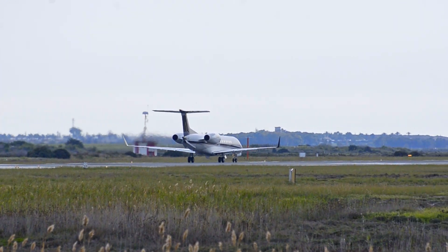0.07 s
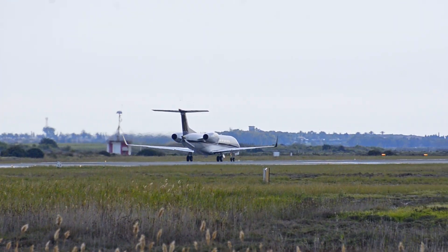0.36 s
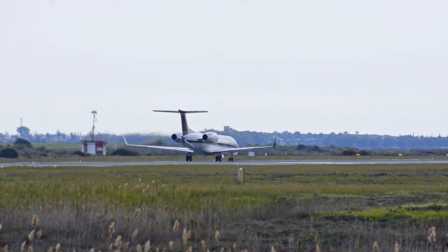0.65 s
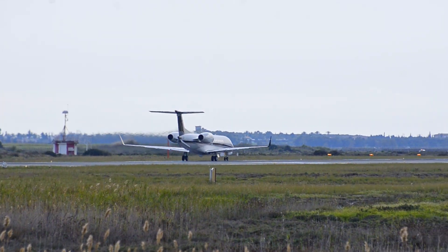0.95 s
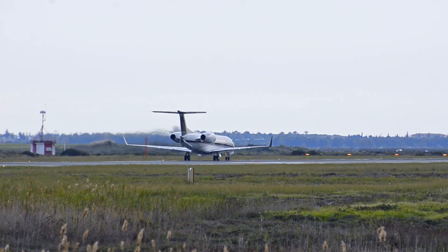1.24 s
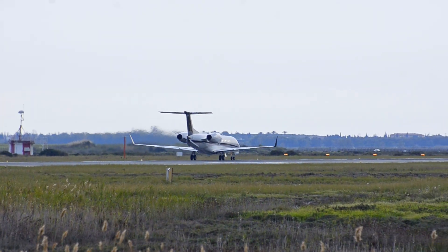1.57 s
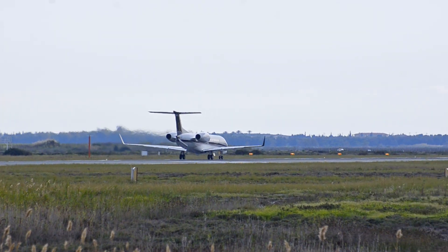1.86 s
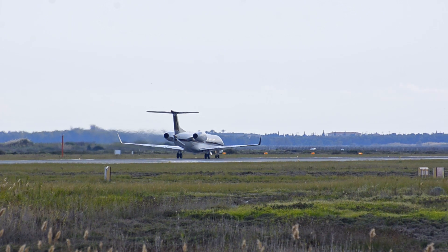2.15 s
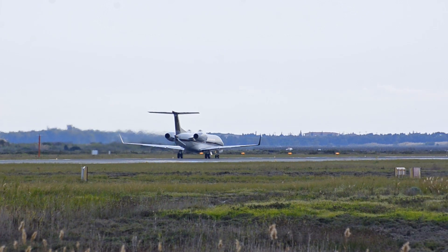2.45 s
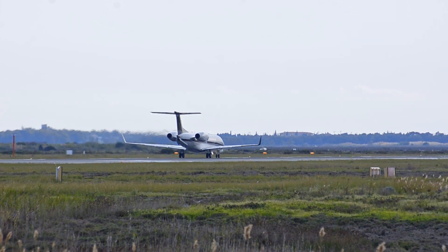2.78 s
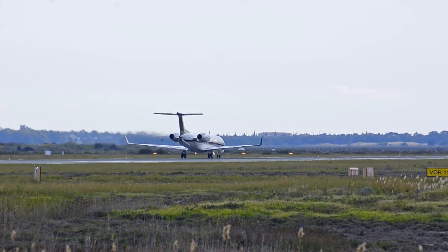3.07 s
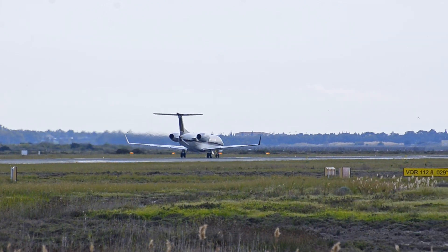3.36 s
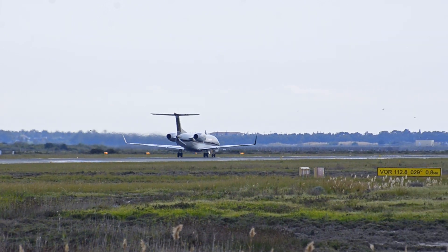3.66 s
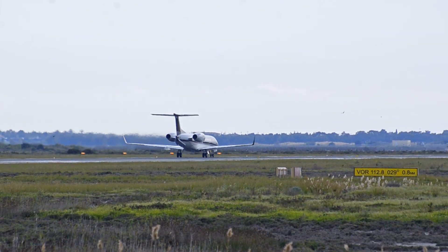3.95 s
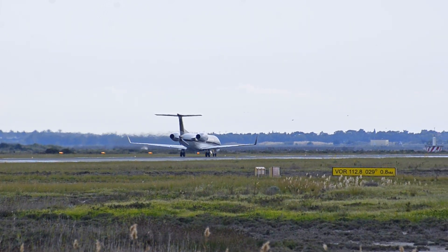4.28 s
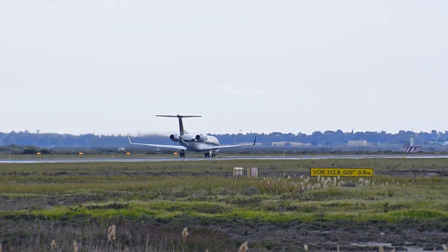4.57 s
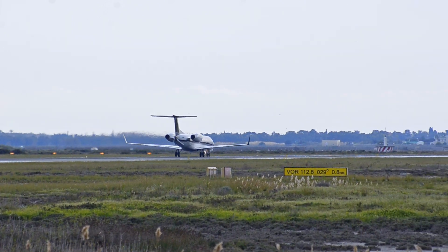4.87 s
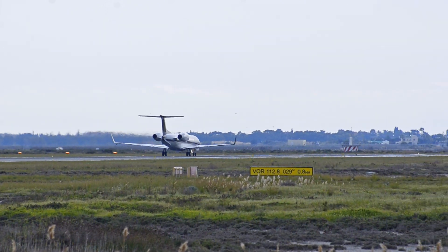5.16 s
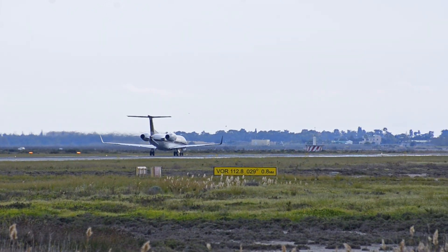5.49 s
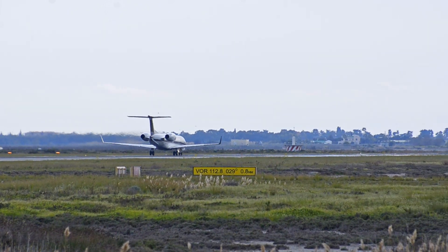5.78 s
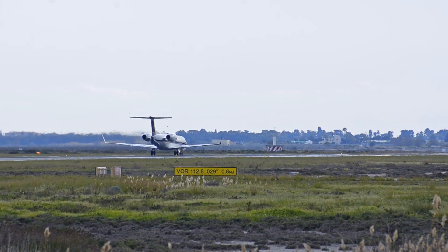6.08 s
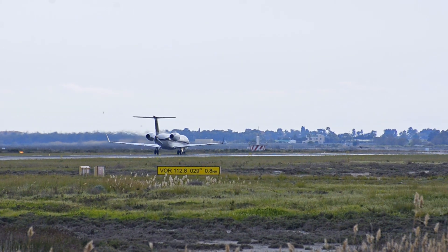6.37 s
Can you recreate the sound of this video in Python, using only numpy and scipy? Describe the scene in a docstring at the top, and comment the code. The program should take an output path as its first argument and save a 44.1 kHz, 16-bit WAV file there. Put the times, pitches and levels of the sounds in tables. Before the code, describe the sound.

A small twin jet rolls away down a runway, heard from far off across a grass field. Its engines make a deep, throbbing rumble under a rushing roar that wavers in the moving air. The sound is loudest at the start and eases gradually without dying out. A very faint engine whine sinks in pitch, and small birds give a few thin, quiet chirps.

```python
"""A grass field, far from a runway down which a small twin jet rolls away.
Turbulent mixing in the exhaust radiates a rumble from large eddies and a roar from smaller ones.
Interference with the reflection from the soft ground carves a dip that climbs as the jet recedes.
Moving air makes the roar swim, a faint fan tone sinks by the Doppler effect and small birds chip.
The camera adds a faint hiss and a thin whine."""
import sys
import numpy as np
from scipy import signal
from scipy.fft import rfft, irfft, next_fast_len
from scipy.io import wavfile
from scipy.ndimage import uniform_filter1d, map_coordinates

SR = 44100
rng = np.random.default_rng(int(sys.argv[2]) if len(sys.argv) > 2 else 0)


def store_wav(level_fs):
    """Save 16-bit WAV to argv[1]."""
    pcm = np.round(np.clip(np.atleast_2d(level_fs), -1, 1) * 32767)
    wavfile.write(sys.argv[1], SR, pcm.T.astype(np.int16))


N = 292318

# Spectra of four exhaust bands, low to high, and of the camera's own noise.
# Each row: frequency in Hz, relative spectral density in dB.
RUMBLE_SPECTRUM = [(10, -30), (22, -24), (40, -10), (55, -2), (84, 2.5), (113, -3), (133, -11.5),
                   (152, -22), (220, -65), (500, -120)]
ROAR_SPECTRUM = [(90, -24.5), (170, -7), (240, -7.5), (330, -3.5), (480, -1.05), (680, -1), (850, -2.5),
                 (1050, -12), (1500, -34.5), (5000, -110)]
RUSH_SPECTRUM = [(500, -27.5), (850, -4), (1050, 2), (1250, -1.5), (1500, -4.5), (1700, -6.5), (1950, -9.5),
                 (2200, -17.5), (2800, -36.5), (6000, -100)]
HISS_SPECTRUM = [(1200, -35), (1850, -5.5), (2200, -0.5), (3000, -7), (4000, -14.5), (5200, -22),
                 (6200, -31), (7500, -38), (15000, -64)]
SELF_NOISE_SPECTRUM = [(100, 0), (6000, 3.5), (8000, 0.5), (11000, -2.5), (14000, -5.5), (15500, -12)]
# Throbs and lulls of the rumble. Each row: midpoint in seconds, length in seconds, lift in dB.
RUMBLE_THROBS = [(0.24, 0.095, 6), (0.414, 0.068, 5.5), (0.763, 0.35, 3), (1.08, .16, -2.8),
                 (1.293, 0.31, 4.5), (2.274, 0.27, 2), (2.55, 0.37, -1.5), (2.894, .35, 2.5),
                 (3.69, 0.14, -3), (4.17, 0.21, 3.5), (4.61, 0.2, 2.2), (5.79, 0.15, -6.5)]
# Envelopes of the roar and the rush. Each row: time in seconds, level in dB.
ROAR_ENVELOPE = [(0, -24), (.42, -26), (.85, -29.5), (1.9, -29.5), (2.62, -29.5), (3.1, -31), (3.7, -34),
                 (4.1, -33), (4.97, -32), (5.35, -35), (6.63, -33.5)]
RUSH_ENVELOPE = [(0, -32.5), (.8, -36), (1.35, -37), (2.1, -35), (2.8, -35), (4.1, -38), (5.4, -38.5),
                 (6.1, -36), (6.63, -37)]
# Drift of the comb made by a nearby reflection. Each row: time in seconds, first notch in Hz.
COMB_DRIFT = [(0, 358), (1, 337), (1.6, 352), (2.3, 321), (3.6, 320), (5.2, 346), (6.63, 348)]
# Moments when the exhaust turns hollow as one band swells or thins.
# Each row: midpoint in seconds, spread in seconds, band centre in Hz, lift in dB.
HOLLOW_MOMENTS = [(.95, .22, 488, 2.5), (.95, .22, 1380, 2), (2.0, .3, 1454, -7.5), (2.45, 0.44, 700, 4.5),
                  (4.9, .25, 747, 2), (5.45, .3, 1083, -4.5)]
# Bird calls. Each row: start in seconds, first and last pitch in Hz, length in seconds, peak in dB.
BIRD_CHIPS = [(0.707, 5850, 5700, 0.08, -68.5), (1.35, 6200, 6150, 0.059, -75),
              (1.59, 6100, 5750, 0.05, -73), (2.845, 6200, 5650, .045, -67), (3.19, 5900, 5850, .06, -69),
              (3.59, 6250, 6050, .04, -71), (5.65, 4960, 4950, .06, -66), (5.75, 5250, 5500, 0.044, -66),
              (5.78, 4800, 4700, 0.049, -62.5)]
# Narrow dips in the camera's response. Each row: centre in Hz, width in Hz, depth from 0 to 1.
CAMERA_NOTCHES = [(5700, 280, .74), (6910, 130, .72)]


def amp(db):
    """Amplitude ratio of a level in decibels."""
    return 10 ** (np.asarray(db) / 20)


def unit(x):
    """The signal normalised to rms 1."""
    return x / np.sqrt(np.mean(x ** 2) + 1e-20)


def curve(rows, t):
    """Linear interpolation of (time, value) rows at times t."""
    return np.interp(t, *np.transpose(rows))


def wobble(knots_per_s):
    """Smooth random modulation: a spline through Gaussian values."""
    knots = rng.standard_normal(int(N * knots_per_s / SR) + 4)
    return map_coordinates(knots, [np.arange(N) * knots_per_s / SR])


def filtered(x, response):
    """Linear filtering: the spectrum of x times a frequency response."""
    size = next_fast_len(N + SR // 2)
    return irfft(rfft(x, size) * response(np.fft.rfftfreq(size, 1 / SR)), size)[:N]


def noise(spectrum):
    """Coloured noise of rms 1, its spectrum interpolated on a logarithmic frequency axis."""
    knot_hz, knot_db = np.transpose(spectrum)
    response = lambda hz: amp(np.interp(np.log(hz + 1), np.log(knot_hz + 1), knot_db))
    return unit(filtered(rng.standard_normal(N), response))


def plume_rumble(t, evenness=0.5):
    """Turbulent mixing: large eddies far down the plume radiate a deep, throbbing rumble."""
    level_db = -24 + 0.03 * t - 0.0948 * t ** 2  # fades ever faster as the jet gathers speed
    throbs_db = sum(db * np.cos(np.pi * np.clip((t - middle) / length, -.5, .5))
                    for middle, length, db in RUMBLE_THROBS)
    eddies = noise(RUMBLE_SPECTRUM)
    power = uniform_filter1d(eddies ** 2, size=SR // 14)
    power = np.abs(uniform_filter1d(power, size=SR // 25)) + 1e-9
    evened = unit(eddies / np.sqrt(power) ** evenness)
    flutter_db = 1.13 * wobble(12)
    return amp(level_db + throbs_db + flutter_db) * evened


def over_field(x, patchy_db):
    """Outdoor propagation: interference and refraction colour x; the result has rms 1."""
    hz, t, spectra = signal.stft(x, SR, nperseg=2048)
    hz = hz[:, None]
    bell = lambda centre, octaves: np.exp(-.5 * (np.log2((hz + 1) / centre) / octaves) ** 2)
    # Ground effect: grazing sound cancels against its reflection from the porous soil.
    # The dip climbs as the path grows longer and flatter.
    near_hz, far_hz, climb_s = 260, 488, 3.47
    dip_hz = far_hz + (near_hz - far_hz) * np.exp(-t / climb_s)
    dip_db = (3.5 + 0.39 * t) * bell(dip_hz, octaves=0.23)
    # A reflection near the listener combs the sound, most strongly while the jet is near.
    grass_lowpass = 1 / (1 + (hz / 2500) ** 4)  # rough grass scatters the treble
    reflection = (0.15 + .24 * np.exp(-t / 0.63)) * grass_lowpass
    comb = np.abs(1 + reflection * np.exp(-1j * np.pi * hz / curve(COMB_DRIFT, t)))
    # Moving air focuses and thins patches of the spectrum.
    air = uniform_filter1d(rng.standard_normal(spectra.shape), size=10, axis=0)
    air = unit(uniform_filter1d(air, size=22, axis=1))
    hollow_db = sum(db * np.exp(-.5 * ((t - middle) / spread) ** 2) * bell(centre, octaves=0.18)
                    for middle, spread, centre, db in HOLLOW_MOMENTS)
    colour = comb * amp(patchy_db * air + hollow_db - dip_db)
    # The colour moves while the total power stays.
    power = np.mean(np.abs(spectra) ** 2, axis=1, keepdims=True)
    colour /= np.sqrt(np.sum(power * colour ** 2, axis=0))
    return unit(signal.istft(spectra * colour, SR, nperseg=2048)[1][:N])


def exhaust_roar(t):
    """Eddy size sets frequency: smaller eddies nearer the nozzles radiate roar, rush and hiss."""
    roar_db = curve(ROAR_ENVELOPE, t)
    rush_db = curve(RUSH_ENVELOPE, t)
    hiss_db = -48.5 + .7 * (rush_db - rush_db.mean()) - 0.21 * t  # follows the rush, fades with distance
    roar = amp(roar_db) * over_field(noise(ROAR_SPECTRUM), patchy_db=0.3)
    rush = amp(rush_db) * over_field(noise(RUSH_SPECTRUM), patchy_db=0.5)
    hiss = amp(hiss_db) * over_field(noise(HISS_SPECTRUM), patchy_db=-0.25)
    flutter_db = 0.34 * wobble(14)  # turbulence on the way moves all three together
    return (roar + rush + hiss) * amp(flutter_db)


def fan_tone(t, start_hz=2717, sag_hz_per_s=22, beamed_at_s=1.9, loss_db_per_s=3):
    """Doppler effect: the blade tone sinks as the jet speeds away; moving air makes it waver."""
    hz = (start_hz - sag_hz_per_s * t) * (1 + .004 * wobble(120))
    tone = unit(np.sin(2 * np.pi * np.cumsum(hz) / SR))
    level_db = -62 - loss_db_per_s * np.abs(t - beamed_at_s)  # peaks when beamed at the listener
    return amp(level_db + 3.2 * wobble(4.1)) * tone


def birds(blur=0.01):
    """Frequency modulation: each chip is one short, thin glide, blurred by distance."""
    out = np.zeros(N + SR)
    for start, first_hz, last_hz, length, db in BIRD_CHIPS:
        progress = np.linspace(0, 1, int(length * SR))
        glide_hz = first_hz + (last_hz - first_hz) * progress ** 2
        hz = glide_hz * (1 + blur * wobble(400)[:len(progress)])
        chip = np.sin(np.pi * progress) * np.sin(2 * np.pi * np.cumsum(hz) / SR)
        out[round(start * SR):][:len(chip)] += amp(db) * chip
    return out[:N]


def scene():
    """Superposition: the pressures of jet and birds add in one channel."""
    t = np.arange(N) / SR
    return (plume_rumble(t) + exhaust_roar(t) + fan_tone(t) + birds())[None]


def record(dry, whine_hz=15650, band_limit_hz=15750):
    """Self-noise and band limiting: the camera adds hiss and whine, notches the treble, cuts the top."""
    t = np.arange(N) / SR
    hiss = amp(-74.5) * noise(SELF_NOISE_SPECTRUM)
    whine = amp(-76) * unit(np.sin(2 * np.pi * whine_hz * t))
    soft_ends = np.clip(np.minimum(t, t[-1] - t) / .002, 0, 1)
    notches = lambda hz: np.prod([1 - depth / (1 + (2 * (hz - centre) / width) ** 2)
                                  for centre, width, depth in CAMERA_NOTCHES], axis=0)
    mix = (dry[0] + hiss + whine) * soft_ends
    return filtered(mix, lambda hz: notches(hz) * (hz < band_limit_hz))[None]


dry = scene()
out = record(dry)
store_wav(out)
```